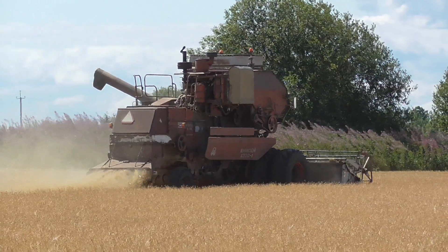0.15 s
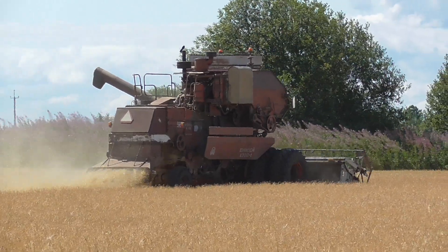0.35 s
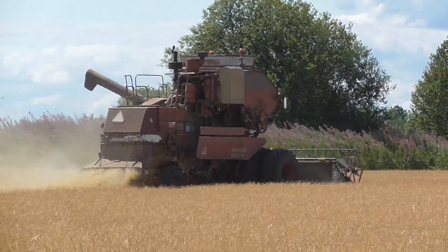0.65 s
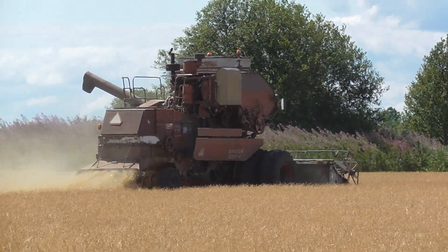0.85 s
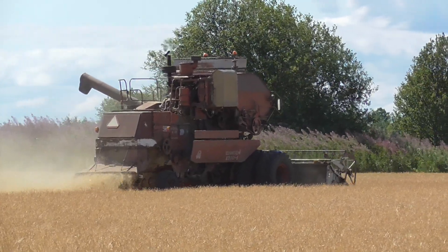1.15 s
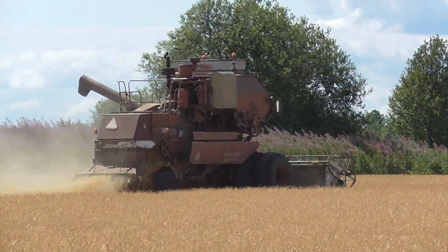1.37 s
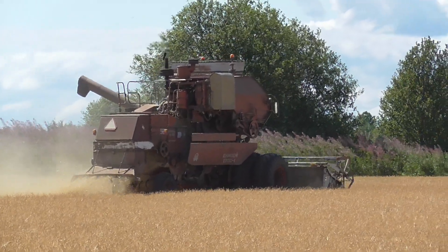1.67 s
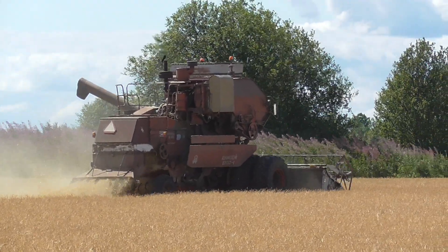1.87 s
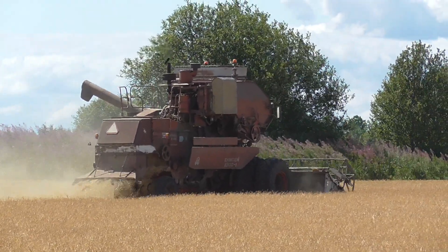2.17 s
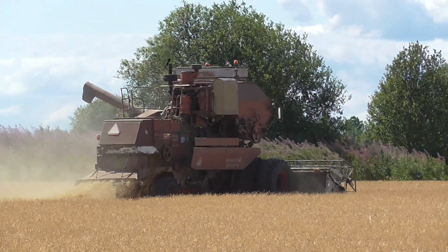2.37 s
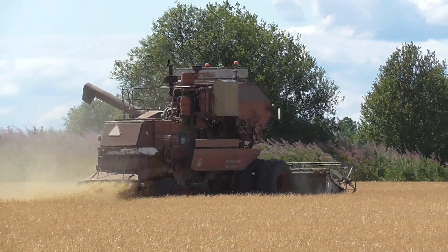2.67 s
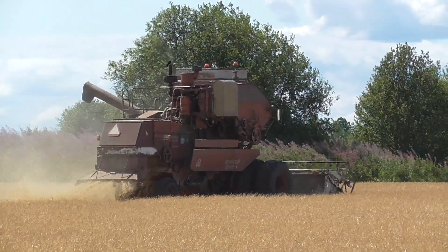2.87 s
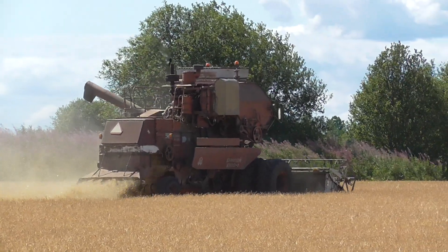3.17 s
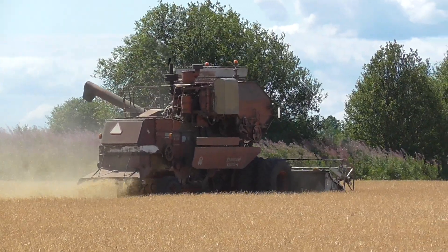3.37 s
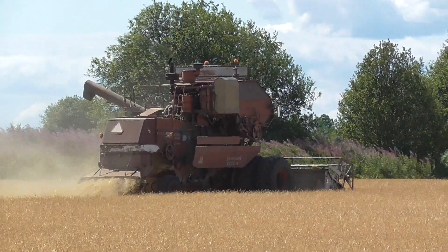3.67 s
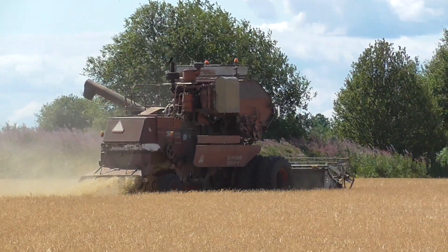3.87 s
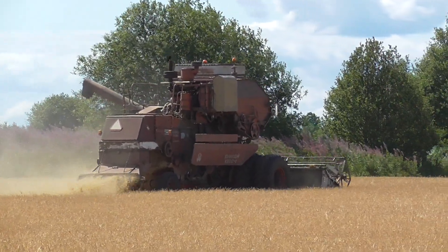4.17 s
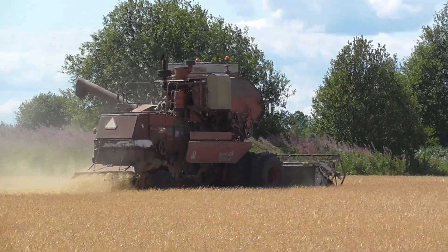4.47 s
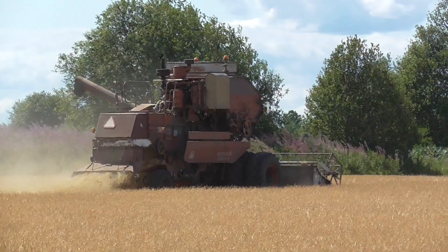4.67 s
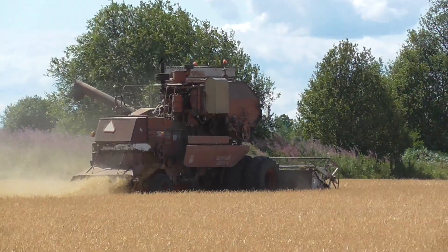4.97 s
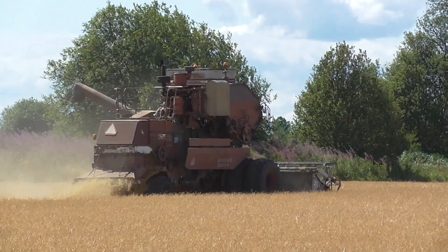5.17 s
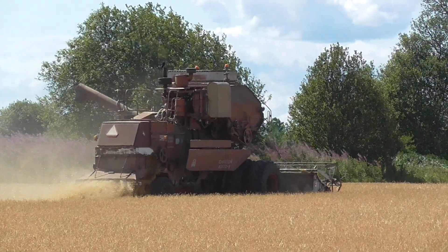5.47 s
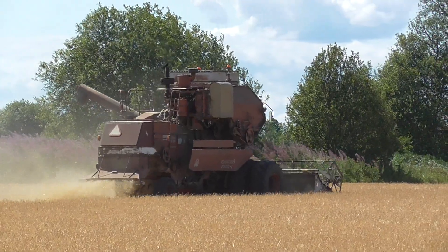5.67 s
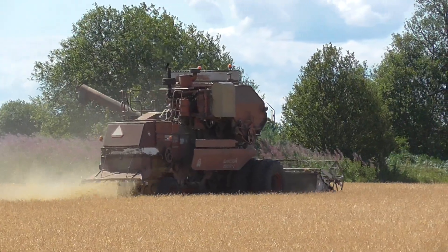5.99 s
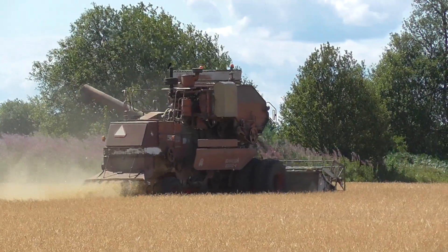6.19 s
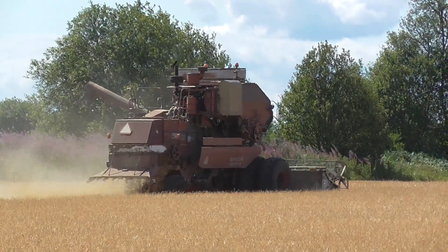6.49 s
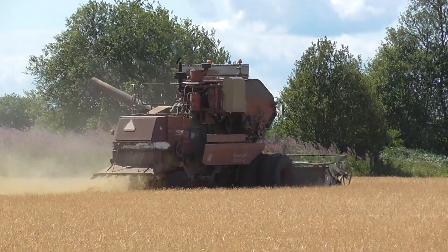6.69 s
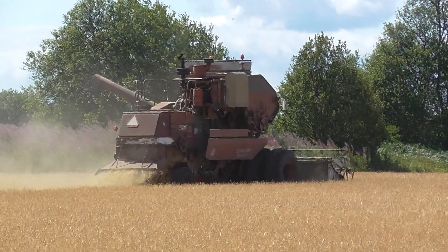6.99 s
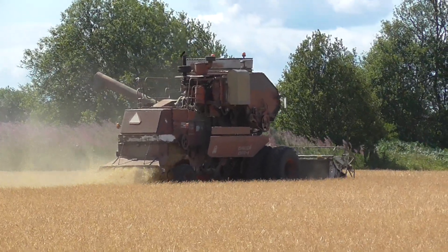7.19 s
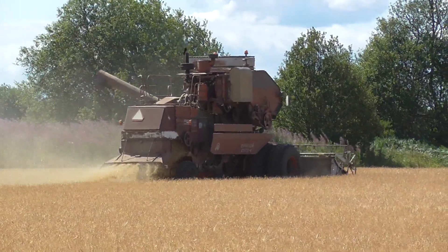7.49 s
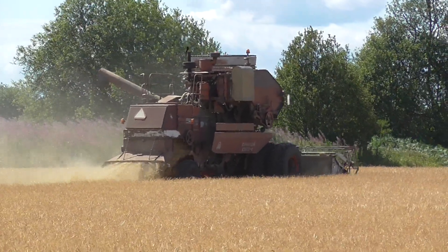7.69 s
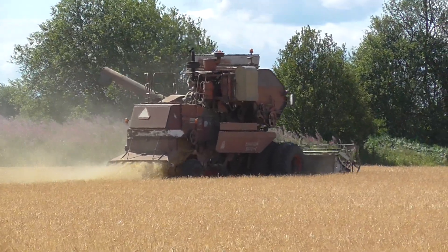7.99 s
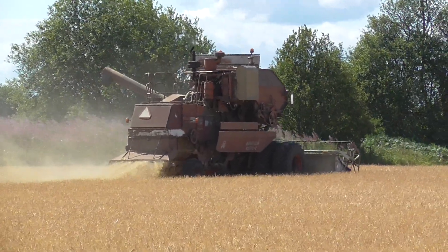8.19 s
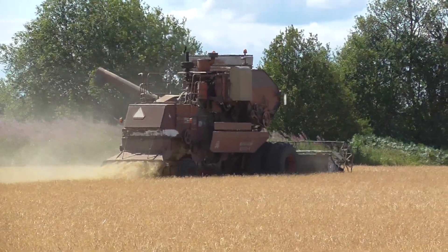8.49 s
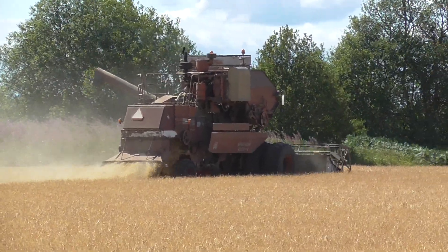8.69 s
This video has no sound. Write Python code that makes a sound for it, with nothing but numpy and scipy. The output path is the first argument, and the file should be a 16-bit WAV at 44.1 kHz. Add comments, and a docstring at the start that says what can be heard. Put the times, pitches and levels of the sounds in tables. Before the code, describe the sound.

Low, rough wind buffets the microphone while a combine harvester rattles, hisses and whines farther off in a field.

```python
"""A low, rough roar of wind buffets the microphone, and behind it a combine harvester works a grain field.
The roar is eddies tumbling past close by, with gusts, lulls, thuds and brief low throbs. Tens of metres
off, the diesel and threshing gear rush and rattle, straw hisses out of the back, gears whine and the
turbocharger whistles; now and then a dry bearing squeaks. Surges of crop swell the rattle and the hiss,
and the moving air lets the machine's treble come and go."""
import sys
import numpy as np
from scipy import signal
from scipy.fft import rfft, irfft
from scipy.io import wavfile

SR = 44100
rng = np.random.default_rng(int(sys.argv[2]) if len(sys.argv) > 2 else 0)


def log_audio(samples):
    """Write samples as a 16-bit WAV file to the path given in sys.argv[1]."""
    # one column per channel
    frames = np.atleast_2d(samples).T
    # limit to full scale, then quantise
    limited = np.clip(frames, -1, 1)
    pcm = np.round(limited * 32767).astype(np.int16)
    wavfile.write(sys.argv[1], SR, pcm)


N = 389844

# Levels in the tables are relative, within each layer.
# the bed of breeze on the microphone: t/s, level/dB, centre of the roar's hump f/Hz
BREEZE_BED = [(0, -17, 240), (1.2, -18, 237), (2.8, -18, 204), (3.2, -20, 192), (4.5, -19.5, 167),
              (5.4, -18.5, 172), (6.3, -19.5, 155), (7.3, -20.5, 189), (8.84, -19.5, 180)]
# gusts on top of the breeze: t/s, length/s, rise/dB
BREEZE_GUSTS = [(0.25, 0.5, 1.5), (0.68, 0.072, 0), (1.85, 0.034, 0.5), (1.95, 0.075, 3),
                (2.045, 0.05, 4.5), (2.48, 0.14, 2), (2.94, 0.06, 5), (3.58, 0.18, 4), (3.835, 0.13, 4.5),
                (4.92, 0.23, 0.5), (5.41, 0.04, 5), (5.59, 0.041, 4), (6.67, 0.072, 3), (6.85, 0.19, 1),
                (7.355, 0.079, 3), (7.61, 0.1, 4), (7.688, 0.063, 4.5), (7.82, 0.23, 2.5),
                (8.08, 0.06, 3.5), (8.385, 0.03, 2), (8.49, 0.25, 3)]
# lulls in the breeze: t/s, length/s, depth/dB
BREEZE_LULLS = [(0.49, 0.18, 2.5), (1.995, 0.026, 2), (3.09, 0.08, 2.5), (4.09, 0.034, 2.5),
                (4.69, 0.066, 6.5), (5.03, 0.095, 4), (5.48, 0.093, 2.5), (6.55, 0.092, 12.5),
                (8.18, 0.054, 1.5), (8.35, 0.022, 3), (8.75, 0.079, 6)]
# flurries of small eddies brighten the roar, or leave it dull: t/s, length/s, lift/dB
EDDY_FLURRIES = [(0.14, 0.11, 1), (1.76, 0.15, -4), (1.88, 0.12, 2), (2.7, 0.44, -1.5), (3.98, 0.029, 3),
                 (4.25, 0.079, -3.5), (4.95, 0.55, -3.5), (5.85, 0.23, 3.5), (6.2, 0.23, -2),
                 (7.68, 0.031, 2.5), (8.22, 0.17, -4)]
# tone colour of the wind's roar: f/Hz, level/dB
WIND_EQ = [(20, -67), (45, -20), (90, -8), (130, -3), (180, -3), (240, -4), (305, -5), (420, -11),
           (560, -17), (850, -23.5), (1300, -30.5), (1800, -43), (3000, -51), (8000, -68.5)]
# how well the moving air carries the machine's treble across the field: t/s, level/dB
AIR_CARRY = [(0.0, -7.5), (1.31, -12), (1.77, -4.5), (2.18, -10.5), (2.36, -0.5), (2.52, 2), (2.63, -3),
             (2.75, -3.5), (3.11, -8.5), (3.23, -3.5), (4.23, -1.4), (5.58, -3.5), (5.72, -5), (5.94, -7.5),
             (6.1, -7), (6.54, -3.5), (7.01, -3), (7.88, -7), (8.2, -8.5), (8.4, -10.5), (8.84, -6.5)]
# surges of crop through the machine: t/s, length/s, rattle lift/dB, straw hiss and whine lift/dB
CROP_SURGES = [(0.05, 0.55, 6.5, 2), (0.084, 0.026, 5, -1), (0.336, 0.029, 10, -9), (0.648, 0.11, 11, 6),
               (0.774, 0.22, 8, 2), (2.033, 0.068, 8, 4), (2.436, 0.28, 6.5, -1.5), (2.79, 0.56, 8, 4.5),
               (3.28, 0.23, 2.5, 4), (3.638, 0.43, 6, 3.5), (4.003, 0.09, 3, 4), (4.695, 0.48, 11, 1),
               (5.132, 0.31, 11.5, 4), (5.488, 0.27, 7.5, 1), (5.96, 0.11, 2, 7), (6.63, 0.79, 6.5, 3),
               (7.03, 0.26, 4, 5), (7.267, 0.47, 11, 2.5), (7.353, 0.039, 2.5, -1), (7.674, 0.47, 8, 4.5),
               (8.39, 0.11, 5.5, 5.5)]
# tone colour of the diesel and threshing gear: f/Hz, level/dB
THRESHING_EQ = [(40, 13), (130, 13), (400, -1.5), (800, 13), (1150, 4), (1450, 10), (1620, 1), (1760, -8),
                (2050, 4.5), (2300, 2.5), (2520, -6.5), (2850, -3.5), (4500, -13.5), (10000, -39)]
# tone colour of the straw hiss: f/Hz, level/dB
STRAW_EQ = [(1500, -15), (3500, 4), (4000, 0.5), (5350, 4), (5650, -2.5), (5950, 2.5), (6250, -4.5),
            (6700, 1), (7600, -3), (8100, 1), (9000, 1), (10300, -3), (12000, -12.5), (15500, -36)]
# steady notes of the gearing: f/Hz, level/dB
WHINE_NOTES = [(2058, -12), (2184, -25), (3102, -29), (4112, -17.5), (4594, -13.5), (6386, -21),
               (6596, -16), (7122, -23)]
# fader ride on all the gear whines: t/s, level/dB
WHINE_RIDE = [(0, -1), (1.4, 6), (2.4, 7), (3.3, 3), (4.2, 5), (5.3, 6), (6.4, 3), (8.84, 2.5)]
# the turbocharger's blade tone: t/s, f/Hz
BLADE_TONE = [(0.0, 9340), (0.24, 9470), (0.57, 9260), (1.05, 9270), (1.55, 9155), (2.14, 9095),
              (2.55, 9150), (3.15, 9185), (3.67, 9410), (4.7, 9340), (5.19, 9220), (5.44, 9280),
              (5.97, 9320), (6.48, 9500), (6.85, 9260), (7.29, 9340), (7.55, 9270), (8.27, 9237),
              (8.84, 9340)]
# the turbo whistle flares up: t/s, length/s, rise/dB
WHISTLE_FLARES = [(0.31, 0.1, 10), (0.83, 0.06, 8), (1.05, 0.18, 4), (1.57, 0.13, 11.5), (1.75, 0.074, 13),
                  (2.07, 0.089, 12), (2.36, 0.063, 10), (2.52, 0.076, 10.5), (3.72, 0.18, 4.5),
                  (4.0, 0.18, 8.5), (4.7, 0.068, 5), (5.27, 0.079, 7), (5.43, 0.14, 14.5),
                  (5.58, 0.032, 21.5), (5.72, .08, 14.5), (6.13, 0.37, 7.5), (6.62, 0.2, 10),
                  (7.14, 0.043, 8), (7.42, 0.065, 9), (7.665, 0.031, 12)]
# tone colour of the diffuse hiss that widens the scene: f/Hz, level/dB
AIR_EQ = [(40, 7), (300, -12), (1400, 6), (2500, 1), (4500, -4), (9000, -3), (12000, -12), (15500, -43)]
# eddies that strike one side of the microphone harder than the other: t/s, length/s, rise/dB
SIDE_EDDIES = [(0.08, 0.1, 21), (1.26, 0.098, 13), (2.32, 0.076, 11), (3.12, 0.25, 18), (4.87, 0.075, 11),
               (6.27, 0.15, 16), (8.28, 0.1, 12)]
# the strongest single buffets: t/s, peak level/dB
BUFFET_HITS = [(0.103, 0.5), (0.261, 0), (0.638, 1.5), (0.672, 0), (1.141, -2), (1.425, -5), (2.856, -1),
               (3.839, -1), (3.851, -1.5), (4.031, -2.5), (5.588, -1), (7.131, 1), (7.348, 1), (7.597, -1),
               (7.639, -2), (7.68, -4), (8.084, 1), (8.378, -1.5), (8.503, -12)]
# eddies peel off evenly and throb on a low note: t/s, length/s, f/Hz, level/dB
THROB_NOTES = [(1.41, 0.065, 220, -15.5), (2.18, 0.03, 260, -26), (2.73, 0.1, 240, -21.5),
               (3.845, 0.067, 223.4, -15.5), (4.85, 0.097, 155, -23), (4.96, 0.062, 175, -17),
               (5.09, 0.07, 160, -24), (5.27, 0.07, 165.6, -18.5), (5.34, 0.031, 204, -18),
               (5.42, 0.051, 142, -30), (7.61, 0.039, 177, -12.5)]
# short squeaks of a dry bearing: t/s, length/s, f/Hz, level/dB
SQUEAK_NOTES = [(2.54, 0.14, 4520, -48.5), (3.45, 0.11, 4100, -52), (4.02, 0.098, 4120, -54),
                (4.65, 0.13, 4594, -54), (5.777, 0.04, 4112, -55), (5.94, 0.08, 4120, -54)]


def undb(db):
    """Decibels to gain."""
    return 10 ** (np.asarray(db) / 20)


def unit(x):
    """Scale to an rms of 1."""
    return x / np.sqrt(np.mean(x ** 2))


def curves(table):
    """Each column of a time table as an automation curve, sample by sample."""
    s, *columns = np.transpose(table)
    return [np.interp(np.arange(N) / SR, s, c) for c in columns]


def turn(hz):
    """Running phase, in radians, of something that cycles at hz."""
    return 2 * np.pi * np.cumsum(hz) / SR


def walk(rate):
    """Smooth random wandering, with a spread of 1, up to about rate changes a second."""
    hz = np.arange(0, 2 * rate, SR / N)
    sway = rng.standard_normal((N // 20, 2))[:len(hz)] @ [1, 1j]  # a random complex spectrum
    rolloff = np.exp(-(hz[:len(sway)] / rate) ** 2)
    return unit(irfft(sway * rolloff, N))


def grains(rate, spread_db):
    """Randomly timed tiny impacts of uneven size and either sign, about rate a second."""
    hits = (rng.random(N) < rate / SR) * rng.choice([-1, 1], N)
    sizes = undb(spread_db * np.clip(rng.standard_normal(N), -2, 2))
    return unit(hits * sizes)


def bell(s, length_s):
    """The samples around time s, and a smooth rise and fall over them."""
    near = np.arange(max(int((s - 2 * length_s) * SR), 0), min(int((s + 2 * length_s) * SR), N))
    return near, np.exp(-(2 * (near / SR - s) / length_s) ** 2)


def swells(table):
    """Smooth fader moves in dB, one for each row of t/s, length/s, lift/dB."""
    out = np.zeros(N)
    for s, length_s, db in table:
        near, shape = bell(s, length_s)
        out[near] += db * shape
    return out


def notes(table, speed):
    """Tones that swell and fade, from rows of t/s, length/s, f/Hz, level/dB; speed bends their pitch."""
    out, angle = np.zeros(N), turn(speed)
    for s, length_s, hz, db in table:
        near, shape = bell(s, length_s)
        out[near] += undb(db) * unit(np.sin(hz * angle[near])) * shape
    return out


def colour(x, points, size=8192):
    """Pass x through a unit-energy EQ shaped by points of f/Hz, level/dB."""
    hz, db = np.transpose(points)
    grid = np.maximum(np.fft.rfftfreq(size, 1 / SR), 1)
    gains = undb(np.interp(np.log(grid), np.log(hz), db))
    cepstrum = irfft(np.log(gains))
    cepstrum[1:size // 2] *= 2  # fold to minimum phase, so nothing rings ahead of a hit
    cepstrum[size // 2 + 1:] = 0
    response = irfft(np.exp(rfft(cepstrum)))
    return signal.fftconvolve(x, response / np.linalg.norm(response))[:N]


def below(x, hz):
    """The part of x under hz, kept in phase with the rest."""
    return signal.sosfiltfilt(signal.butter(2, hz, fs=SR, output="sos"), x)


def around(x, hz, half_width_hz):
    """The band of x near a centre hz that may sweep."""
    carrier = np.exp(1j * turn(hz))
    return 2 * np.real(below(x / carrier, half_width_hz) * carrier)


def wind(churn_db=0.97, hump_db=-4, hump_drift=0.14, rumble_db_per_octave=9, small_db=1, flutter_db=0.9):
    """Eddies tumble over the microphone: big ones rumble, the commonest make a hump, small ones flurry."""
    breeze_db, hump_hz = curves(BREEZE_BED)
    gust_db = breeze_db + swells(BREEZE_GUSTS) - swells(BREEZE_LULLS)
    eddies = unit(grains(rate=1300, spread_db=2.5) + rng.standard_normal(N))
    roar = colour(eddies * undb(churn_db * walk(44)), WIND_EQ)
    hump = around(roar, hump_hz * (1 + hump_drift * walk(11)), half_width_hz=49.7)
    large, small = below(roar, hz=130), roar - below(roar, hz=320)
    medium = roar - large - small
    rumble = undb(rumble_db_per_octave * np.log2(hump_hz.mean() / hump_hz))  # heavier as the hump sinks
    flurries = undb(small_db + swells(EDDY_FLURRIES) + flutter_db * walk(26))
    return unit(large * rumble + medium + hump * undb(hump_db) + small * flurries) * undb(gust_db)


def threshing(firing, load_db, knock_db=-6, knock_rise=0.85, shake_db=0.5, panel_hz=1400, panel_db=-12):
    """Diesel, drum and sieves rattle with the firings; under load knocks stand out and a panel rings."""
    strain = undb(knock_rise * (load_db - load_db.max()))
    knocks = grains(rate=190, spread_db=1.5) * undb(knock_db) * strain
    rattle = unit(rng.standard_normal(N) + knocks) * undb(shake_db * walk(45))
    pulse = 1 + 0.053 * np.cos(firing) + 0.065 * np.cos(2 * firing)
    body = colour(rattle * pulse, THRESHING_EQ)
    panel = around(body, np.full(N, panel_hz), half_width_hz=60)
    return body + undb(panel_db) * strain * panel


def straw(firing, throb=0.04, tick_db=-10.5):
    """Chaff hisses through the shaking machine; stalks and grain tick on its sheet metal."""
    hiss = rng.standard_normal(N) * (1 + throb * np.cos(firing))
    ticks = grains(rate=31, spread_db=3)
    return colour(unit(hiss + undb(tick_db) * ticks), STRAW_EQ)


def gear_whines(wobble=0.00295, flutter_db=4.5):
    """Meshing gears sing on nearly steady notes, each fluttering in level by itself."""
    speed = 1 + wobble * walk(67)
    ride_db, = curves(WHINE_RIDE)
    tones = np.zeros(N)
    for hz, db in WHINE_NOTES:
        flutter = undb(flutter_db * walk(35))
        tones += undb(db) * unit(np.sin(turn(hz * speed)) * flutter)
    return tones * undb(ride_db)


def turbo(firing, wander_hz=17, ripple_hz=10, fade_db=3.5, flutter_db=4, throb=0.12, fray=0.11):
    """The blade tone ripples with each exhaust pulse; turbulent air makes it twinkle and frays it."""
    hz, = curves(BLADE_TONE)
    tone = np.sin(turn(hz + wander_hz * walk(38) + ripple_hz * np.sin(firing)))
    roughness = 1 + throb * np.cos(firing) + fray * walk(550)
    twinkle_db = np.minimum(fade_db * walk(21) + flutter_db * walk(100), 7)
    return unit(tone * roughness * undb(twinkle_db)) * undb(swells(WHISTLE_FLARES))


def harvester(carry_db, firing_hz=65.8, rattle_db=-44, treble_db=-52.5, straw_trim_db=3, turbo_db=-47):
    """Surges of crop load the drum and throw out straw; the air lets the treble come and go."""
    firing = turn(firing_hz * (1 + 0.0082 * walk(0.78)))  # the engine speed drifts a little
    load_db = swells([(s, length_s, db) for s, length_s, db, _ in CROP_SURGES])
    spill_db = swells([(s, length_s, db) for s, length_s, _, db in CROP_SURGES])
    rattle = threshing(firing, load_db) * undb(rattle_db + load_db + 0.33 * carry_db)
    treble = straw(firing) * undb(straw_trim_db) + gear_whines()
    treble *= undb(treble_db + spill_db + carry_db)
    whistle = turbo(firing) * undb(turbo_db + carry_db)
    flicker = undb(walk(25))  # moving air makes the far sound flicker by about 1 dB
    return (rattle + treble) * flicker + whistle


def air_hiss(carry_db, gain_db=-60, carry_share=0.87, flicker_db=2):
    """A faint, diffuse hiss flickers, rising and falling with the machine's treble."""
    hiss = colour(rng.standard_normal(N), AIR_EQ)
    return hiss * undb(gain_db + carry_share * carry_db + flicker_db * walk(11))


def crosswind(floor_db=-59):
    """A faint roar swells when an eddy strikes one side of the microphone harder."""
    return colour(rng.standard_normal(N), WIND_EQ) * undb(floor_db + swells(SIDE_EDDIES))


def buffets(push_s=0.00019, gain_db=-7):
    """A big eddy gives one short push and a dull thud."""
    hits = np.zeros(N)
    for s, db in BUFFET_HITS:
        hits[int(s * SR)] += undb(db)
    push = np.exp(-np.arange(N) / SR / push_s)
    thud = colour(push, WIND_EQ)[:SR // 10]
    return undb(gain_db) * signal.fftconvolve(hits, thud / np.abs(thud).max())[:N]


def wind_throbs(wobble=0.0666):
    """Evenly shed eddies make a lump of unsteady low tone in the roar."""
    return notes(THROB_NOTES, speed=1 + wobble * walk(38.2))


def bearing_squeaks(wobble=0.006, scratch_db=3, scrape=0.51):
    """A dry bearing sings out for a moment, unsteady in pitch and half lost in its own scraping."""
    scratch = undb(scratch_db * walk(90)) * (1 + scrape * walk(600))
    return notes(SQUEAK_NOTES, speed=1 + wobble * walk(134)) * unit(scratch)


def scene():
    """Machine and wind sit in the centre; a little hiss and crosswind give the width."""
    carry_db, = curves(AIR_CARRY)
    mid = harvester(carry_db) + bearing_squeaks() + wind() + wind_throbs() + buffets()
    side = air_hiss(carry_db) + crosswind()
    return np.array([mid + side, mid - side])


def record(dry):
    """A soft clip rounds off the hardest wind peaks, and a steep low-pass cuts the top."""
    ceiling, top_hz = 0.8, 15500
    rounded = dry / (1 + (dry / ceiling) ** 6) ** (1 / 6)
    return signal.sosfilt(signal.ellip(8, .2, 70, top_hz, fs=SR, output="sos"), rounded)


dry = scene()
out = record(dry)
log_audio(out)
```